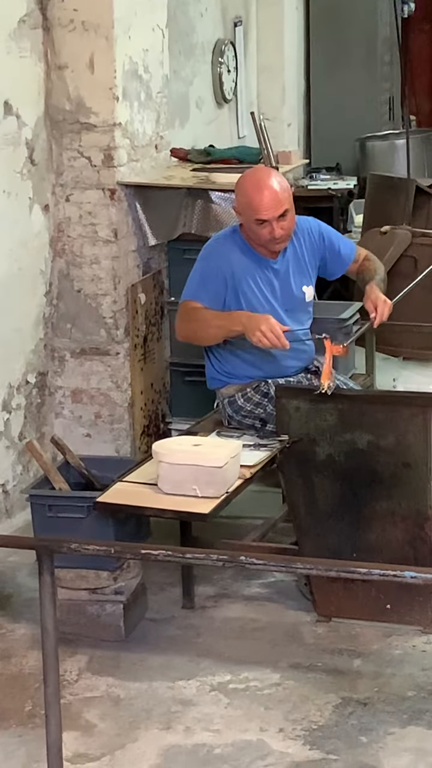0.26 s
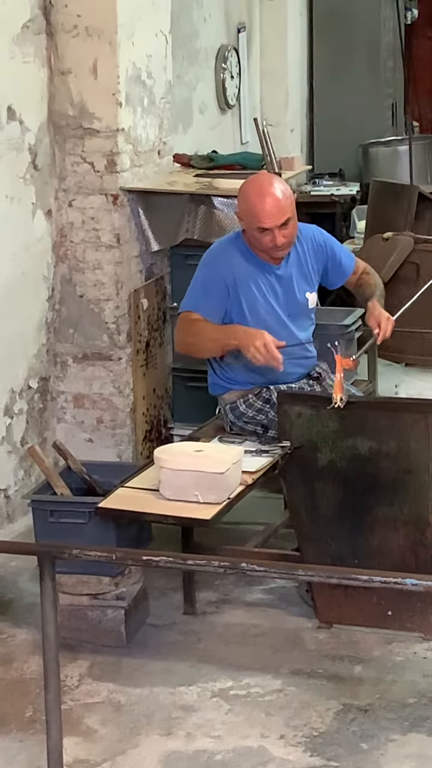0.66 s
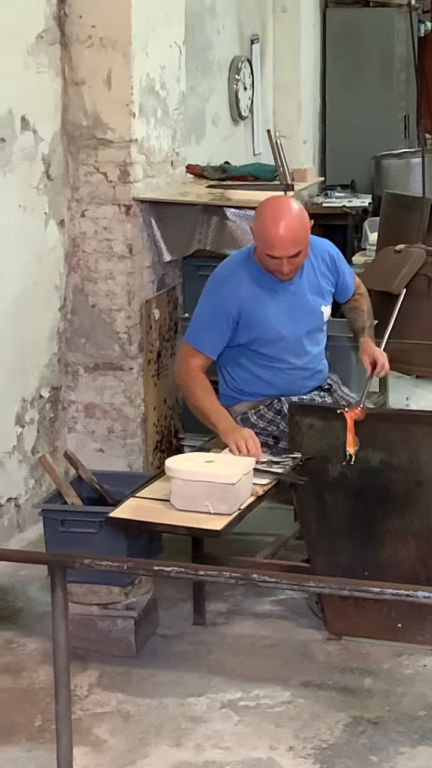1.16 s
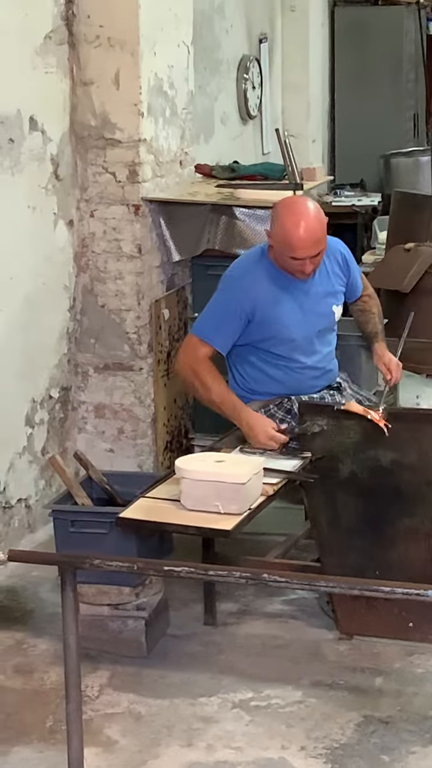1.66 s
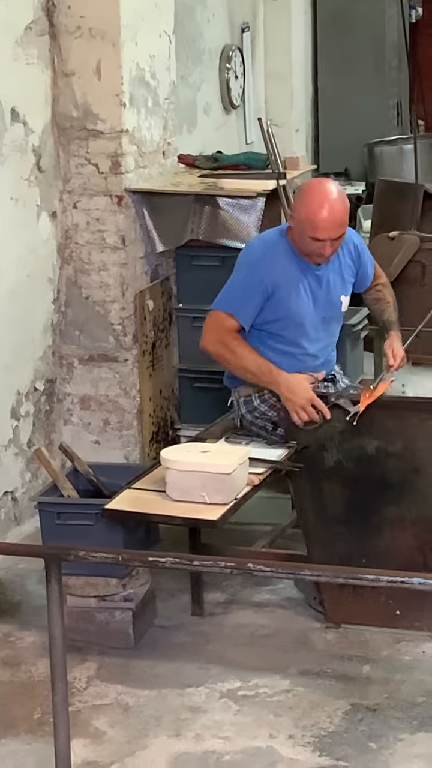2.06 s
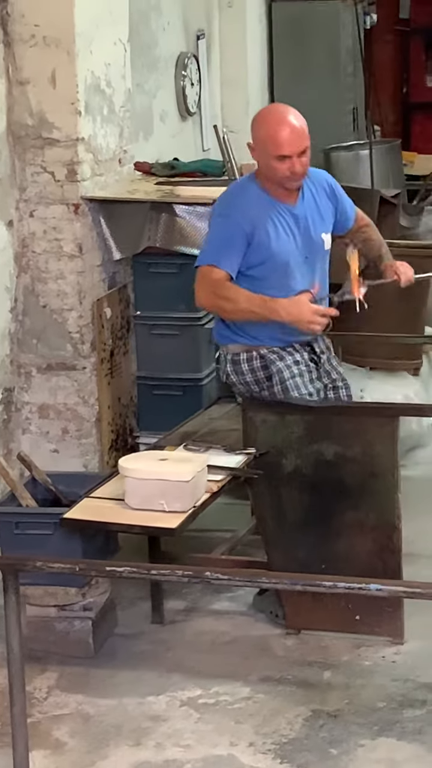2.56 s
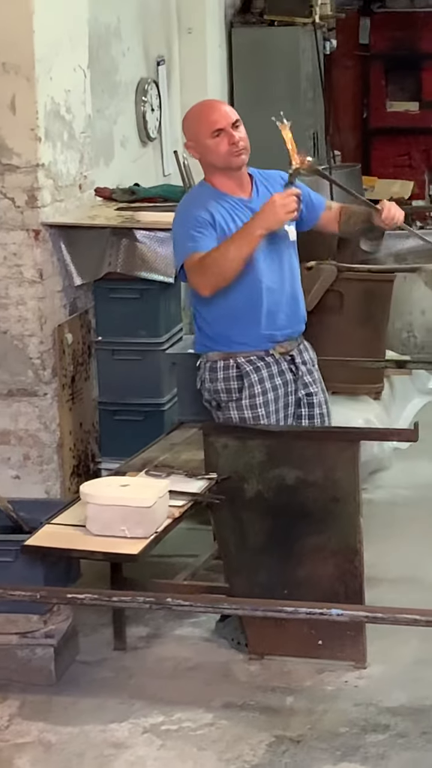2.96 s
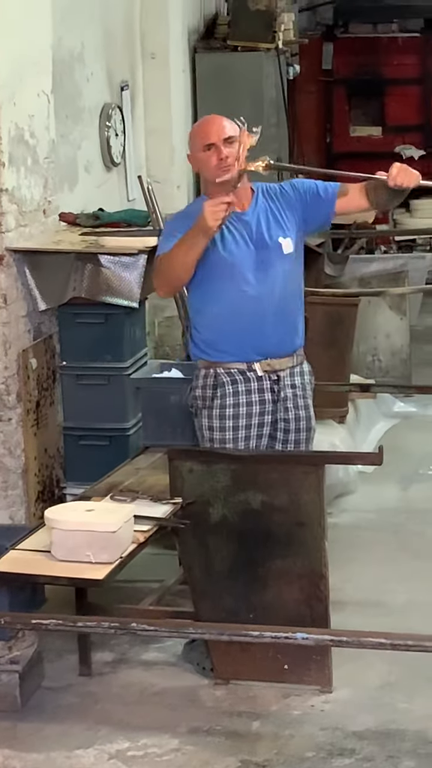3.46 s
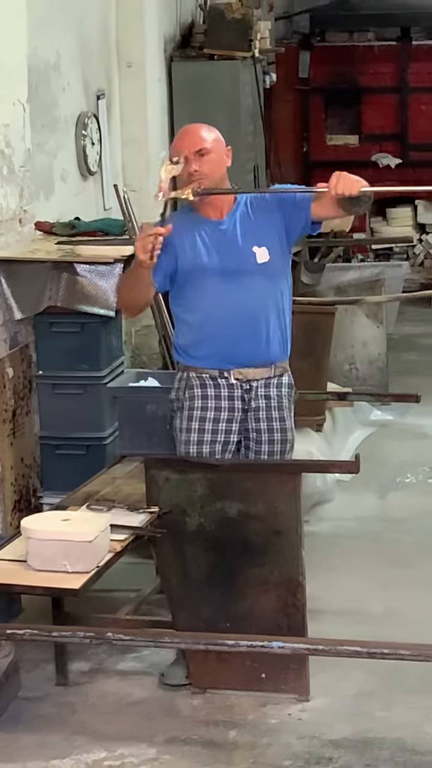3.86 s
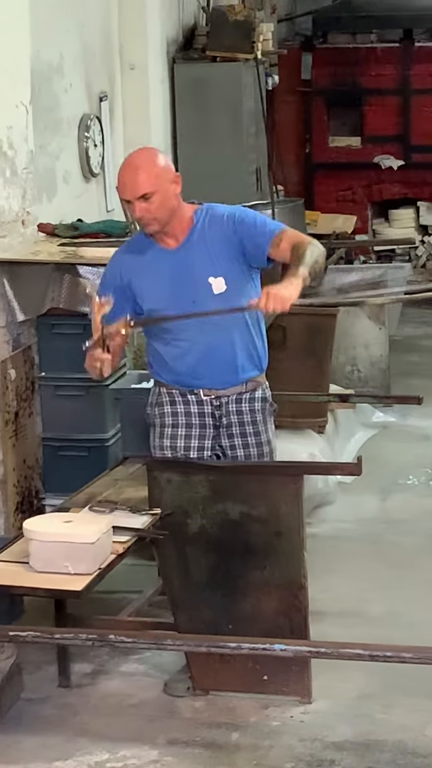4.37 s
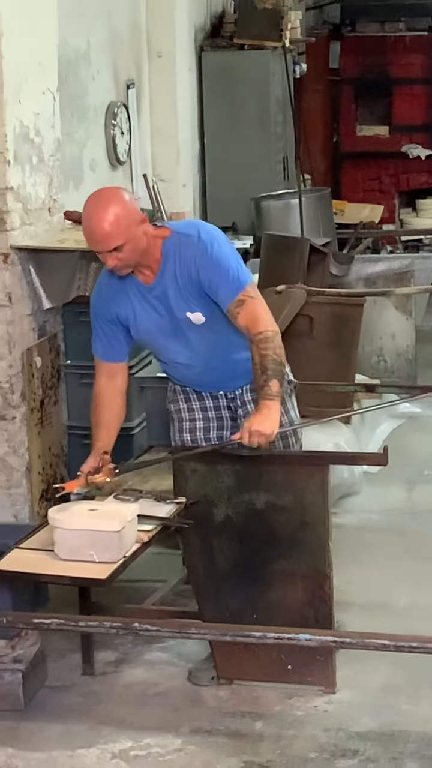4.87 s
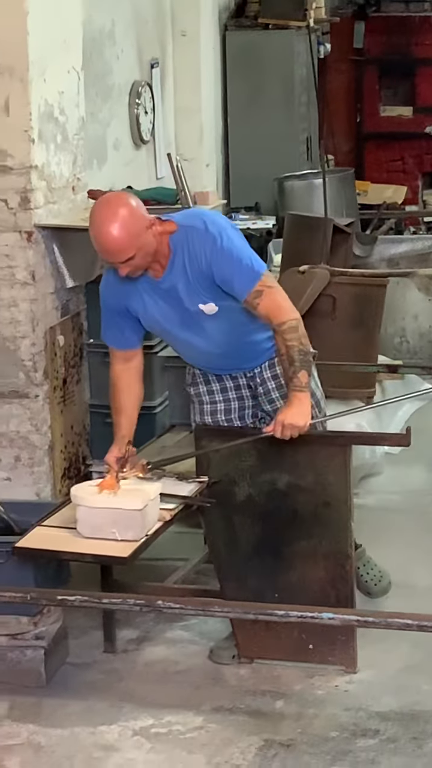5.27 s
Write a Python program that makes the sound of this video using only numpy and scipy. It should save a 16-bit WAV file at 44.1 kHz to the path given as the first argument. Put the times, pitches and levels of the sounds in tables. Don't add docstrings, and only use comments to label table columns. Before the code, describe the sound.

A continuous, bass-heavy furnace roar fills a brick workshop, slightly uneven, with dull booms and airy gas hiss. A light scrape of metal comes first, then a hard steel clack with a quick rattle and short bright ring just before two seconds. Afterwards only barely audible ticks sit over the flames. Handheld stereo perspective, tools fairly near, furnaces behind, slight room echo.

```python
import sys
import numpy as np
from scipy import signal
from scipy.fft import rfft, irfft, next_fast_len
from scipy.io import wavfile
from scipy.ndimage import uniform_filter1d

SR = 44100
rng = np.random.default_rng(int(sys.argv[2]) if len(sys.argv) > 2 else 0)


def pcm_store(signal):
    levels = np.round(np.clip(np.atleast_2d(signal), -1, 1) * 32767)
    wavfile.write(sys.argv[1], SR, levels.astype(np.int16).T)


def attenuation_scalar(level_db):
    decades = np.asarray(level_db, float) / 20
    return 10 ** decades


N = 243649
SIZE = next_fast_len(N + SR)
HZ = np.maximum(np.arange(SIZE // 2 + 1) * SR / SIZE, 1)

# pitch_hz, t60_s
HALL_DECAY = [(500, 1), (2000, 0.67), (5000, 0.53), (9000, 0.31), (14000, 0.13)]
HALL_DB, HALL_COLOUR = -35, 0.71
# pitch_hz, lead_half_turns
LEFT_LEAD = [(20, 0), (300, -.06), (900, .03), (1800, .1), (2300, .42), (3600, .45), (4830, 1), (6900, 2),
             (9000, 3), (15000, 6)]
# pitch_hz, power_share
APART = [(30, 0.02), (100, 0), (350, 0.05), (600, 0.3), (1200, 0.09), (2100, 0.4), (3200, 0.4),
         (4500, 0.05), (6000, 0.26), (12000, 0.3)]
LEFT_DB = -0.01

# time_s, level_db
FLAME = [(0.0, -24), (0.519, -25), (0.57, -22.5), (0.609, -24), (0.91, -24), (0.98, -24), (1.03, -24.5),
         (1.45, -24.5), (1.61, -25.5), (1.97, -25), (3.31, -25), (4.011, -25.5), (4.14, -26.5), (4.21, -25),
         (4.57, -25.5), (4.6, -24), (5.52, -25.5)]
LAYER_EDGES_HZ = [70, 120, 175, 215, 300, 420, 2200, 4700, 8200]
FLAME_SHARES = [0.92, 1, 0.95, 1, .2]
# pitch_hz, level_db per Hz
ROAR = [(22, -88), (45, -59.5), (70, -55.5), (285, -56.5), (315, -66.5), (400, -68.5), (470, -77),
        (640, -78), (900, -73), (1300, -75.5), (1400, -86), (2100, -89), (3400, -93.5), (5100, -99.5)]
# pitch_hz, level_db
HISS = [(5100, -2), (5600, -2.5), (7300, -8.5), (7700, -13), (9000, -13), (9600, -15.5), (12000, -17),
        (14300, -22.5), (15000, -26.5), (15400, -45.5)]
# pitch_hz, width_hz, lift_db
RESONANCES = [(91.3, 32, 3), (154, 7.2, 1.5), (175.7, 25.7, -5), (192.7, 12.5, 10.5), (214, 8.1, -15),
              (229.2, 29, 7), (277, 6.9, 4), (351.8, 27.3, 12.5), (483.7, 12, 7.5), (541, 24, 9),
              (598, 19, 7),
              (763, 70, 3), (848, 27, 8.5), (940, 15, 2.5), (966, 33, 6.5), (1073, 38, -4), (1141, 24, 10),
         (1191, 16, 8.5), (1232, 13, -0.5), (1283, 40, 10), (1418, 27, 10), (1552, 33, 9), (1667, 27, 8.5),
         (1704, 30, 12), (1796, 40, 7), (1856, 27, 8), (1950, 60, -7.5), (2006, 35, 8.5), (2020, 21, 2.5),
         (2160, 33, -1), (2550, 18, 4), (2770, 19, 7.5), (3076, 30, 9), (3292, 54, 7.5), (3870, 54, 6),
         (4980, 280, 5.5), (6800, 170, 4), (8400, 300, 1)]
# centre_s, lift_db
GULPS = [
    (.08, 5),
    (.57, 1),
    (.96, 5.5),
    (1.75, 1),
    (2.22, 1.5),
    (3.7, 6.5),
    (4.62, 1.5),
    (5.42, 5.5),
]
# centre_s, lift_db
LULLS = [(.3, 2), (1.15, 0.2), (1.46, -4), (1.72, -2.5), (1.98, 1.5), (2.2, 0), (2.85, -1), (3.15, -3),
         (3.41, -1.5), (3.8, 0.8), (4.14, -4.5), (4.45, 1.5), (4.85, 3.3), (5.12, 0.5), (5.38, 0)]
# centre_s, lift_db
SMALL_CHAMBER_LULLS = [(.33, -4), (.8, 2), (1.2, -0.5), (1.8, 0), (2.4, 0), (3.0, 0.2), (3.52, -4.5),
                       (4.0, 3), (4.6, -1), (5.2, -3)]
# centre_s, lift_db
SURGES = [(0, 5), (.42, 3), (.95, 2), (2.55, 3), (2.75, 2), (3.64, 4), (4.0, 3), (4.25, 2), (4.5, 2),
          (4.74, 4.5), (5.24, 4), (5.5, 3)]
SURGE_SHARES = [.4, 1.3, .6]
GULP_S, LULL_S, SURGE_S = 0.034, 0.07, 0.06
CALM_HISS_DB = -3

# centre_s, level_db, pitch_hz, half_length_s
BOOMS = [(.0002, -22.5, 320, 0.0031), (0.362, -42.5, 500, 0.039), (0.438, -34, 55, 0.075),
         (.57, -21, 145, 0.038), (0.957, -29.5, 120, 0.033), (1.272, -42, 470, 0.048),
         (2.1, -33.5, 230, .05), (2.653, -47.5, 520, 0.075), (3.305, -35.5, 188, 0.047),
         (3.455, -24, 274, 0.02), (3.651, -36.5, 402, 0.039), (4.12, -46, 560, 0.044),
         (4.25, -27.5, 197, 0.084), (4.619, -25.5, 73, 0.021), (4.76, -33, 48, 0.058),
         (5.091, -23, 204, 0.034), (5.303, -27, 174, 0.035), (4.2, -42.5, 1200, 0.045),
         (.75, -46, 1160, 0.11), (2.6, -46.5, 1210, 0.13), (1.856, -36, 233.3, 0.023),
         (1.4, -47.5, 590, 0.067), (4.9, -43.5, 1131, 0.044), (5.35, -48, 522, 0.074), (4.3, -28, 197, .06),
         (1.1, -29.5, 255, 0.044), (1.8, -30, 200, 0.032), (4.72, -32, 130, 0.037), (2.7, -31, 280, .025),
         (2.67, -33, 198, .03), (2.85, -32, 150, 0.055), (.3, -33.5, 150, .05)]
# pitch_hz, width_hz, level_db
WHISTLES = [(5100, 250, -77), (7100, 250, -82), (8500, 250, -88)]
# start_s, level_db, pitch_hz, width_hz, length_s
TICKS = [(0.65, -50, 1388, 24, 0.035), (0.258, -67.5, 9900, 1200, 0.048), (0.43, -64, 5300, 260, 0.022),
         (0.527, -74, 8500, 806, 0.016), (2.7, -56, 2600, 610, 0.01), (2.24, -73.5, 9400, 880, 0.061),
         (2.522, -65, 10500, 2500, 0.012), (2.53, -64.5, 6900, 400, 0.03), (2.62, -64, 11100, 650, 0.0091),
         (2.618, -60, 6700, 500, 0.013), (5.09, -66, 8450, 300, .045), (5.2095, -48, 4600, 4000, 0.0026),
         (1.38, -58, 14700, 1800, .008), (1.384, -61.5, 14500, 1500, .025),
         (5.2095, -60.5, 9000, 5000, .0015), (1.718, -57.5, 10800, 1500, .012),
         (5.305, -77, 8500, 400, 0.085), (5.367, -74, 9000, 6000, 0.0092)]

# start_s, crack_db, bright_edge_db, rattle_s, ring_freedom (0-1)
BLOWS = [
    (1.38, -29, -46, 0.11, 0.1),
    (1.718, -40, -54, 0.11, 0.4),
    (1.745, -55, -47, 0.097, 0.6),
    (1.7662, -18.5, -60, 0.1, 0.85),
    (1.774, -18.5, -55, 0.037, 0.8),
    (1.803, -30.5, -65, 0.13, 0.35),
    (1.841, -33, -67, 0.16, 0.1),
    (1.871, -35.5, -71, 0.09, 0.1),
    (2.02, -49, -57, 0.14, 0),
    (2.045, -46.5, -61, 0.14, 0.2),
]
TONGS_HZ = [587, 690, 870, 1025, 1610, 1880, 2066, 2306, 2917, 3243, 3646, 3771, 4030, 4535, 4710, 4770,
            5146, 5286, 5600, 5825, 6008, 6250, 6385, 6510, 6586, 6760, 7108, 7935, 8200, 8533, 9010, 9518,
            9800, 10910, 11950, 14400]
# level_db, t60_s
TONGS_MODES = [(0, 0.14), (-6, 0.1), (-6, .06), (2.5, 0.077), (-8.5, 0.2), (-21, .1), (-8.5, 0.23),
               (-5, .15), (-17, 0.17), (-2, 0.27), (-19.5, 0.21), (-12, .2), (-2, 0.19), (-10, .2),
               (-6, .2), (-8, .2), (2.5, .27), (2.5, 0.42), (-10.5, .25), (1, 0.43), (-0.5, .33),
               (-2.5, 0.28), (-10, .2), (-8.5, .2), (4.5, .2), (-16, .15), (0, .2), (-12, 0.25), (-11, .15),
               (-14, .15), (-14, .2), (-14.5, .1), (-2, 0.2), (-16.5, .15), (-10, 0.14), (-3, 0.17)]
# pitch_hz, level_db
CRACK = [(450, -15), (650, -1), (1300, -8.5), (2000, 0.5), (3000, -6.5), (4000, 1), (6500, 0.5), (9800, -6),
         (11000, -14), (13000, -22), (14300, -33), (14600, -55)]
# pitch_hz, level_db
BRIGHT_EDGE = [(1500, -14.5), (4000, -13), (7000, 0), (10000, 5), (12000, -8), (14300, -6), (14600, -35),
               (16000, -45)]
RING_DB = -42
RATTLE_DB, CONTACT_S, RISE_S = 2.5, 0.0015, 0.0035

# pitch_hz, level_db
WEAKER_LOST = [(4000, -33), (4430, -9.5), (4900, -10), (5400, -15), (6600, -4), (9000, -4), (11300, -3.5),
               (12000, -6), (13000, -4.5), (14100, -7), (15000, -6)]
# pitch_hz, level_db
FAINT_LOST = [(7000, -16), (10000, -5.5), (12000, 0), (13400, 2.5), (14100, 2.5), (14800, 8), (15500, 14)]
# pitch_hz, level_db
MASKING = [(7000, -3), (10500, -3), (11500, -4), (12200, -5), (13400, -6), (14100, -14), (14800, 0)]


def along(points, log=True):
    hz, value = np.transpose(points)
    if log:
        return np.interp(np.log(HZ), np.log(hz), value)
    return np.interp(HZ, hz, value)


def filtered(x, response):
    return irfft(rfft(x, SIZE) * response, SIZE)[..., :N]


def split(edge_hz):
    return 1 / (1 + (HZ / edge_hz) ** 8)


def evened(x, span_s):
    power = uniform_filter1d(np.mean(x ** 2, axis=0), int(span_s * SR))
    return x * np.sqrt(np.mean(power) / power)


def swells(rows, width_s):
    t = np.arange(N) / SR
    return sum(db * np.exp(-.5 * ((t - s) / width_s) ** 2) for s, db in rows)


def in_stereo(shared, own):
    apart = np.clip(along(APART), 0, 1) * (1 - split(110))
    return filtered(shared, np.sqrt(1 - apart)) + filtered(own, np.sqrt(apart))


def hall(seconds=1):
    t = np.arange(seconds * SR) / SR
    white = rng.standard_normal((3, SIZE))
    out, below = 0, 0
    for hz, t60 in HALL_DECAY:
        upto = split(hz * 1.5) if hz < 12000 else 1
        band = filtered(white, np.sqrt(upto - below))[:, :len(t)]
        out = out + band * attenuation_scalar(-60 * t / t60)
        below = upto
    return out


def flame_colour(echoes):
    resonances = RESONANCES
    lift_db = sum(db / (1 + (2 * (HZ - hz) / width) ** 2) for hz, width, db in resonances)
    standing = np.abs(rfft(echoes[0, :int(.12 * SR)], SIZE)) ** 2
    standing = standing / uniform_filter1d(standing, int(150 * SIZE / SR))
    depth = HALL_COLOUR * (1 - split(3500))
    return attenuation_scalar(along(ROAR) + along(HISS) + lift_db) * np.sqrt(1 - depth + depth * standing)


def flame_levels():
    s, strength_db = np.transpose(FLAME)
    swing = np.interp(np.arange(N) / SR, s, strength_db - np.mean(strength_db))
    rumble, roar, jet, hiss, top = np.outer(FLAME_SHARES, swing)
    low, high, highest = np.outer(SURGE_SHARES, CALM_HISS_DB + swells(SURGES, SURGE_S))
    thumping = rumble + swells(GULPS, GULP_S)
    chamber = roar + swells(LULLS, LULL_S)
    small_chamber = roar + swells(SMALL_CHAMBER_LULLS, LULL_S)
    return [thumping] * 3 + [chamber] * 2 + [small_chamber, jet, hiss + low, hiss + high, top + highest]


def burners(echoes):
    white = rng.standard_normal((3, N)) * np.sqrt(SR / 2)
    noise = rfft(in_stereo(white[0], white[1:]), SIZE) * flame_colour(echoes)
    shares = [split(hz) for hz in LAYER_EDGES_HZ] + [1]
    out, below = 0, 0
    for upto, db in zip(shares, flame_levels()):
        layer = irfft(noise * np.sqrt(upto - below), SIZE)[:, :N]
        out = out + evened(layer, span_s=0.38) * attenuation_scalar(db)
        below = upto
    return out


def booms():
    t, out = np.arange(N) / SR, 0
    for s, db, hz, length in BOOMS:
        bell = np.exp(-.5 * ((t - s) / length) ** 2)
        out = out + attenuation_scalar(db) * bell * np.cos(2 * np.pi * hz * (t - s))
    return out


def whistles():
    out, white = 0, rng.standard_normal((len(WHISTLES), 2, N))
    for (hz, width, db), (breath, chance) in zip(WHISTLES, white):
        tone = filtered(breath, 1 / (1 + (2 * (HZ - hz) / width) ** 2))
        swell = filtered(chance, split(5.0))
        out = out + attenuation_scalar(db + 5 * swell / np.std(swell)) * tone / np.std(tone)
    return out


def ticks():
    out, white = np.zeros(N), rng.standard_normal(N)
    t = np.arange(int(.25 * SR)) / SR
    for s, db, hz, width, length in TICKS:
        i = int(s * SR)
        r = np.exp(-np.pi * width / SR)
        resonance = [1, -2 * r * np.cos(2 * np.pi * hz / SR), r * r]
        puff = white[i:i + len(t)] * np.exp(-(t[:N - i] / length) ** 2)
        for _ in range(2):
            puff = signal.lfilter([1, 0, -1], resonance, puff)
        out[i:i + len(t)] += attenuation_scalar(db + 8.0) * puff / np.max(np.abs(puff))
    return out


def tongs():
    ring, bursts = np.zeros(N), np.zeros((2, N))
    white = rng.standard_normal((2, N))
    contacts = uniform_filter1d(rng.standard_normal(N), int(CONTACT_S * SR))
    white = white * attenuation_scalar(RATTLE_DB * (contacts / np.std(contacts) - .5))
    uneven = rng.standard_normal((len(BLOWS), len(TONGS_MODES)))
    t = np.arange(int(.6 * SR)) / SR
    for (s, crack_db, edge_db, rattle, free), chances in zip(BLOWS, uneven):
        span = slice(int(s * SR), int(s * SR) + len(t))
        fade = attenuation_scalar(-60 * t / rattle) * np.minimum(t / RISE_S, 1)
        bursts[:, span] += attenuation_scalar(np.array([[crack_db], [edge_db]])) * fade * white[:, span]
        for hz, (db, t60), chance in zip(TONGS_HZ, TONGS_MODES, chances):
            r, w = attenuation_scalar(-60 / (t60 * SR)), 2 * np.pi * hz / SR
            strength = min(free, 1) * attenuation_scalar(crack_db + RING_DB + db + 2 * chance)
            shake = strength * fade * white[0, span]
            mode = [1, -2 * r * np.cos(w), r * r]
            ring[span] += signal.lfilter([0, np.sin(w)], mode, shake + 1e-18)
    crack = filtered(bursts[0], attenuation_scalar(along(CRACK)))
    edge = filtered(bursts[1], attenuation_scalar(along(BRIGHT_EDGE)))
    return filtered(ring, split(14800) ** 2) + crack + edge


def scene():
    echoes, heavy, light = hall(), tongs(), ticks()
    wet = filtered(heavy + .35 * light, rfft(echoes, SIZE)) * attenuation_scalar(HALL_DB)
    furnaces = burners(echoes) * attenuation_scalar([[LEFT_DB], [-LEFT_DB]])
    shared = heavy + light + whistles() + booms() + wet[0]
    return furnaces + in_stereo(shared, wet[1:])


def thinned(pair):
    hz, _, frames = signal.stft(pair, SR, nperseg=2048)
    edges = np.r_[0, 160, 176, 196, 216, 240, 264, 292, 320:len(hz):32]
    widths = np.diff(np.r_[edges, len(hz)])
    bands = np.repeat(np.arange(len(edges)), widths)
    centres = hz[(edges + widths // 2)[bands]]

    def ratio(table):
        return attenuation_scalar(2 * np.interp(centres, *np.transpose(table), left=-200))[:, None]

    lines = np.abs(frames) ** 2
    power = np.add.reduceat(lines, edges, axis=1)[:, bands] / widths[bands, None]
    usual = np.median(power.sum(axis=0), axis=1, keepdims=True)
    ringing = lines[:, (hz > 4000) & (hz < 8000)].sum(axis=(0, 1))
    usual = usual * np.maximum(1, ratio(MASKING) * ringing / np.median(ringing))
    strong_side = power > ratio(WEAKER_LOST) * power[::-1]
    strong_line = lines > ratio(FAINT_LOST) * usual / 2
    return signal.istft(frames * strong_side * strong_line, SR)[1][:, :N]


def low_pass(x):
    return signal.sosfilt(signal.butter(12, 15900, fs=SR, output="sos"), x)


def record(dry):
    fade_out = np.minimum(np.arange(N)[::-1] / (0.0039 * SR), 1)
    half_lead = .5j * np.pi * along(LEFT_LEAD, log=False)
    left, right = filtered(dry * fade_out, np.exp(half_lead * np.array([[1], [-1]])))
    total, difference = thinned(np.array([left + right, left - right]) / 2)
    return low_pass(np.array([total + difference, total - difference]))


dry = scene()
out = record(dry)
pcm_store(out)
```